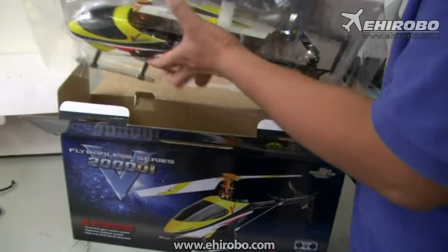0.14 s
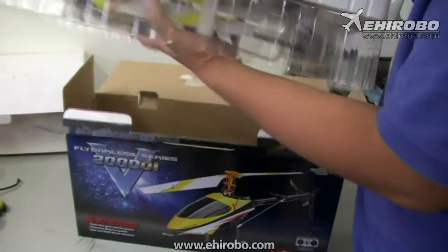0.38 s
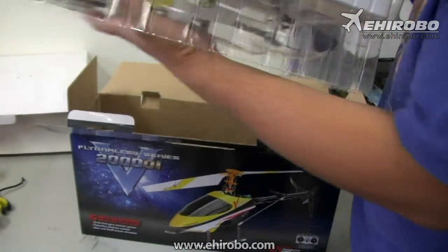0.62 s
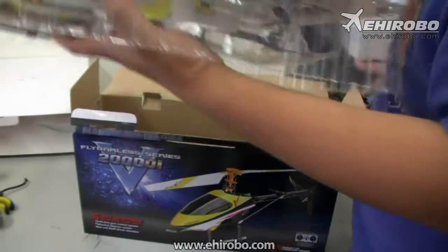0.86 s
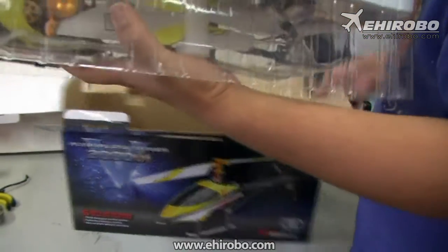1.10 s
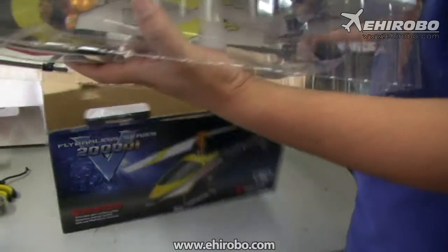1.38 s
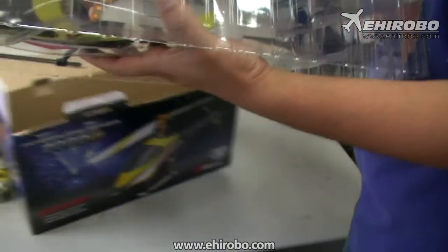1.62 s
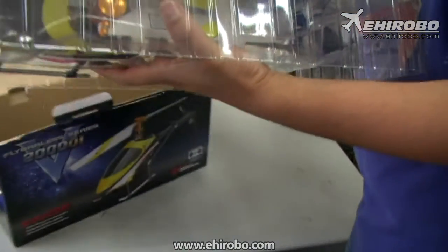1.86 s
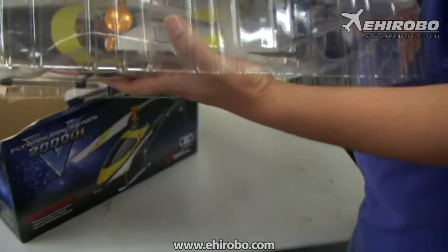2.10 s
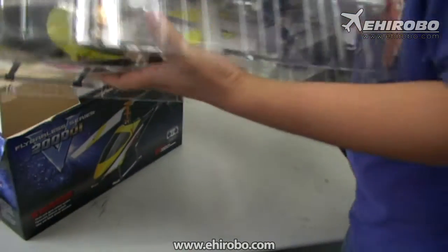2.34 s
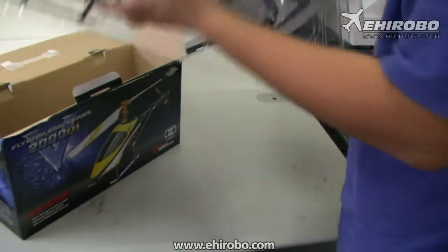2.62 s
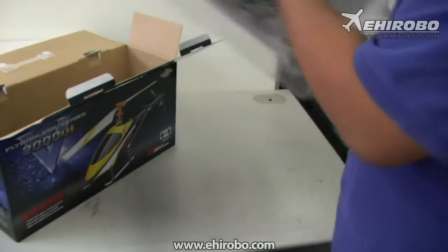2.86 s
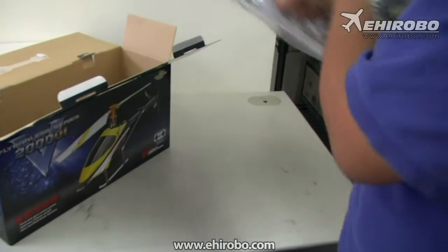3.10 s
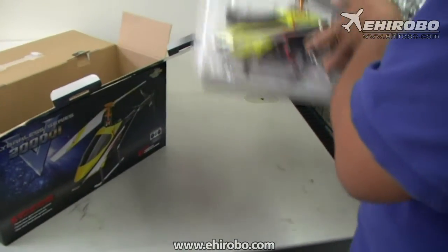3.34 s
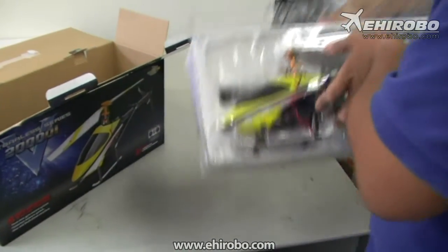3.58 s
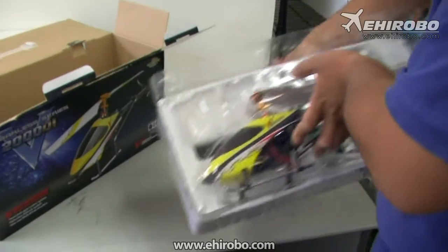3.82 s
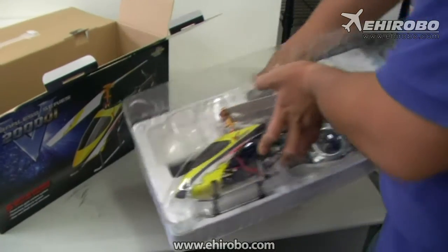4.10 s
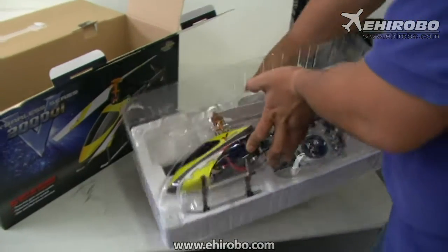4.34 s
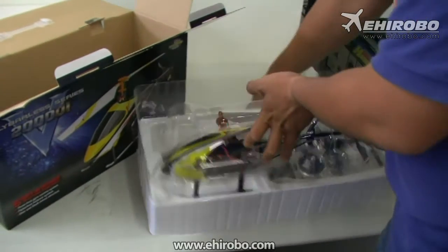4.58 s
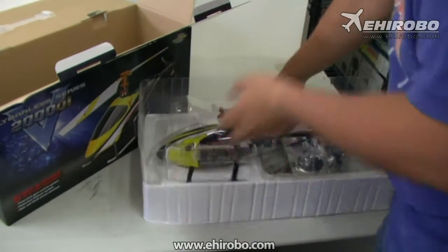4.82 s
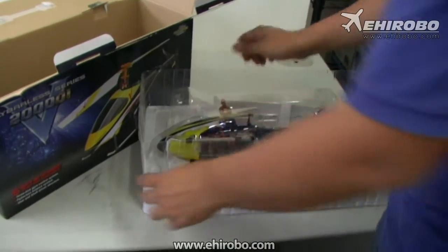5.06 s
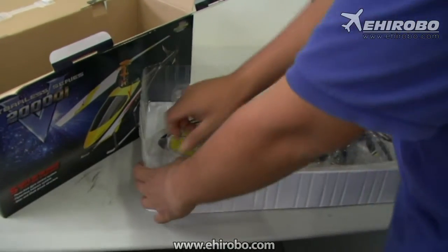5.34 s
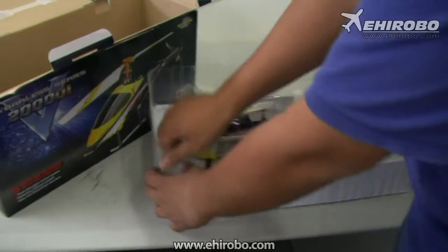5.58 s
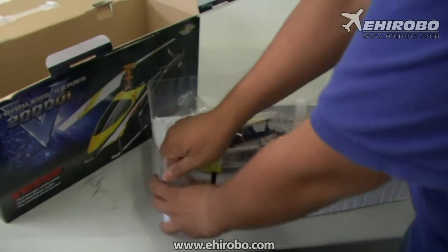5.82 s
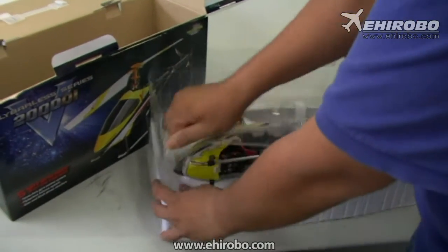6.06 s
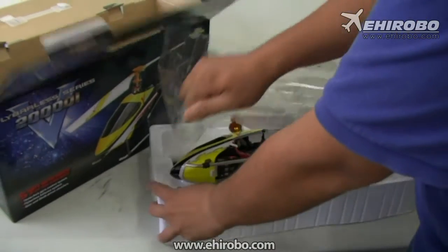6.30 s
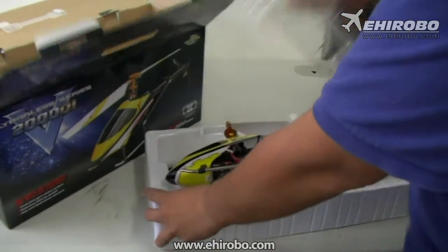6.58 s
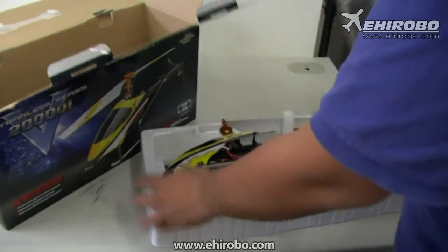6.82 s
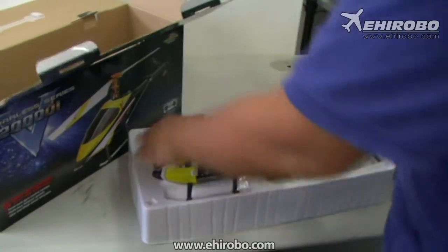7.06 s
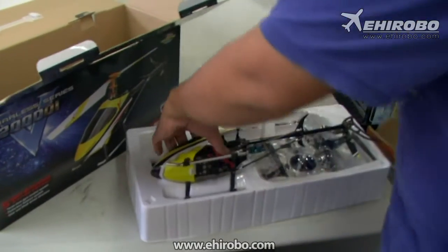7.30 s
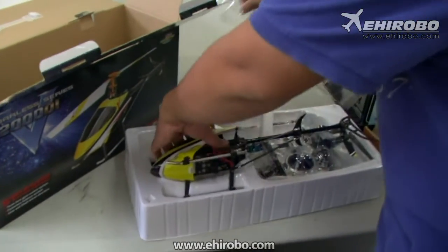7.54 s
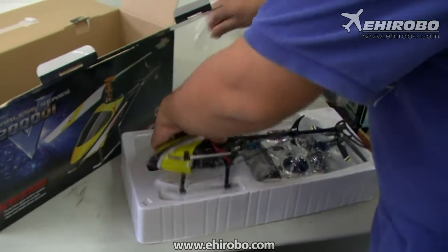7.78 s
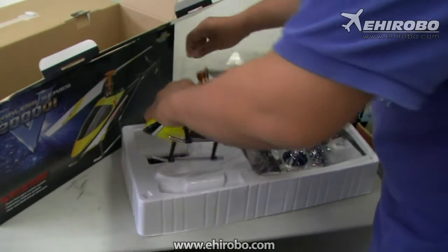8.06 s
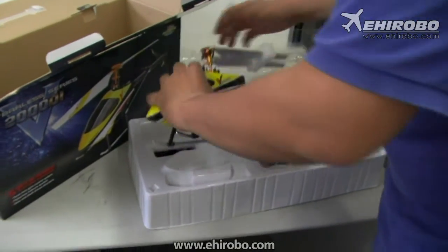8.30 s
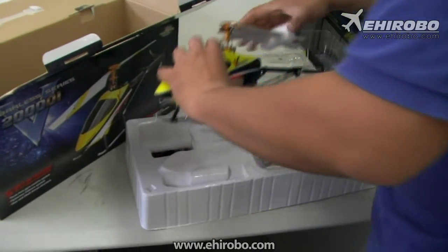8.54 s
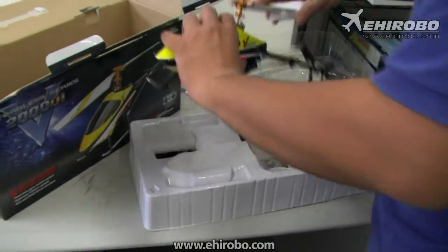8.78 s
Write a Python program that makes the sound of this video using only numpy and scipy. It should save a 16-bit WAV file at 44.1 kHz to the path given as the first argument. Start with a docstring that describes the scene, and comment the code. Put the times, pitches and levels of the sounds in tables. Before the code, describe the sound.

Hands lift a stiff plastic tray from a carton with soft crinkles and small snaps. The carton rubs across the table, then the tray is set down with clustered clacks. Prying off the lid brings very loud, sharp cracks that overload the microphone, followed by sparse clicks and knocks. Close stereo camera sound in a small hard room, with steady air and hiss.

```python
"""Hands lift a thin plastic tray out of a carton: stiff walls snap and crinkle as bursts of tiny slips ring them.
The carton is pushed aside, clumped slips rubbing card and plastic on the table, under faint narrow treble bands
of noise. The tray is set down and its lid pried off with the loudest snaps, which overload a camera microphone
pair; its gain control sinks and creeps back. A small hard room answers throughout, over steady air and hiss."""
import sys
import numpy as np
from scipy import signal
from scipy.io import wavfile
from scipy.ndimage import uniform_filter1d

SR = 44100
rng = np.random.default_rng(int(sys.argv[2]) if len(sys.argv) > 2 else 0)


def natural_amplitude(level_db):
    """Convert a level in decibels to a linear amplitude factor, elementwise."""
    exponent = np.asarray(level_db, float) / 20
    return 10 ** exponent


def output_pcm(signal):
    """Save a mono or channel-first signal as 16-bit PCM at the path in sys.argv[1].

    Samples are clipped to [-1, 1] before scaling.
    """
    pcm = np.clip(np.atleast_2d(signal).T, -1, 1) * 32767
    wavfile.write(sys.argv[1], SR, np.round(pcm).astype(np.int16))


N = 392931  # length in samples

# Snaps of buckling walls: start_s, level_db (relative), panel pitch_hz, crack_db (relative to level_db),
# buckling_s
SNAPS = [(0.042, -23.5, 514, -9.5, 0.0041), (0.103, -19.5, 575, -14.5, 0.0074),
         (0.202, -14.5, 633, -13.5, 0.013), (0.281, -15.5, 613, -24, 0.0055), (0.4, -19, 1700, -23, 0.0084),
         (0.429, -12.5, 1250, -39, 0.0061), (1.617, -28.5, 1370, -9.5, 0.035),
         (1.677, -5.5, 1600, -33, 0.0055), (2.263, -19, 345, -33, 0.014), (2.986, -18.5, 720, -16, 0.011),
         (3.062, -20.5, 584, -9, 0.013), (3.14, -27.5, 670, -8.5, 0.0079),
         (3.205, -16.5, 1120, -14.5, 0.011), (3.557, -22.5, 614, -42, 0.0062),
         (3.638, -16, 677, -59, 0.0071), (4.084, -14, 1130, -13.5, 0.0093),
         (4.112, -17, 690, -15.5, 0.0078), (4.154, -17.5, 710, -14.5, 0.016),
         (4.299, -4.5, 660, -17.5, 0.015), (4.385, -14, 860, -32, 0.0079), (4.543, -12, 522, -14, 0.015),
         (4.595, -5.5, 810, -20, 0.0079), (4.677, -9.5, 640, -22, 0.005),
         (4.697, -4.5, 1930, -24.5, 0.0059), (4.723, -16.5, 870, -12, 0.0051),
         (4.8, -10, 810, -15.5, 0.0094), (4.818, -13.5, 820, -37, 0.0093), (4.879, -16.5, 1320, -12, 0.036),
         (5.268, -13.5, 533, -21, 0.0039), (5.614, -22, 795, -30, 0.0088), (5.666, -16.5, 840, -38, .012),
         (5.804, -9, 830, -13, 0.0035), (5.829, -16.5, 840, -15.5, .008), (5.901, 15, 1600, -19.5, 0.0042),
         (6.013, -3, 784, -8.5, 0.012), (6.054, 13, 796, -12.5, 0.0047), (6.112, 7, 1990, -10.5, 0.0085),
         (6.262, -3, 795, -8, 0.0066), (6.355, 9, 920, -12, 0.0045), (6.42, 13.5, 923, -14.5, 0.0063),
         (6.429, -0.5, 746, -10.5, 0.0072), (6.457, 1, 690, -4, 0.0057),
         (6.737, -11.5, 1220, -20.5, 0.0048), (7.055, -38, 2650, 0.5, 0.0059),
         (7.137, -38.5, 1460, -4, 0.012), (7.272, -15, 1040, -44, 0.014), (7.292, -4.5, 1240, -44, 0.0084),
         (7.549, 9.5, 1304, -27.5, 0.0048), (7.587, -2.5, 720, -20, 0.0053),
         (7.665, -5, 714, -34.5, 0.0066), (7.828, -11.5, 2410, -25.5, 0.0055),
         (8.012, -17.5, 814, -50, 0.003), (8.091, -24, 1250, -23, 0.014), (8.155, 0.5, 706, -27.5, 0.014),
         (8.185, 5.5, 3050, -23.5, 0.01), (8.196, -3.5, 1600, -19.5, 0.013), (8.31, -3.5, 3020, -33, 0.024),
         (8.358, -9.5, 580, -41, 0.0061), (8.395, -4, 2900, -42, 0.0079)]
# Hollow pockets and walls of the tray: pitch_hz, width_hz, level_db (relative)
TRAY_MODES = [(518, 110, 3), (688, 64, 8), (810, 76, 5), (1250, 647, 0.5), (1600, 516, 2.5),
              (2030, 870, -2)]
# Spectrum of the sharp crack: frequency_hz, density_db (relative, per Hz)
CRACK_SPECTRUM = [(600, -16), (1200, 10.5), (2500, 11.5), (3900, 5), (5500, 2), (7500, -1), (12000, -4.5),
                  (15600, -15)]
# Spectrum of the sliding faces: frequency_hz, density_db (relative, per Hz)
SLIDE_SPECTRUM = [(1470, -27.5), (2500, -2), (3730, 0), (7370, -3), (9070, 0.5), (12400, -3.5),
                  (15600, -11.5)]
# Spectrum of the table's thud: frequency_hz, density_db (relative, per Hz)
THUD_SPECTRUM = [(90, -24.5), (190, -5), (330, -1.5), (480, 2.5), (900, -31.5)]
# Strokes of rubbing: start_s, length_s, creak_db (of tray or carton), hiss_db (sliding faces, relative to creak),
# drum_db (table, relative to creak), rubbed part's pitch_hz
STROKES = [(-.08, 0.21, -44.5, -2, -22, 1220), (0.275, 0.15, -46.5, -1.5, -18, 1220),
           (0.384, 0.14, -48, 1, -5, 1210), (1.024, 0.073, -51, -6, 1.5, 820),
           (1.081, 0.18, -37.5, -4.5, -12, 886), (1.217, 0.23, -49.5, 6, -24, 950),
           (1.6, 0.23, -35, -22.5, -1, 1360), (1.669, 0.38, -29.5, -1.5, -20.5, 1640),
           (2.024, 0.42, -50, 2.5, -4.5, 1380), (2.719, 0.26, -40.5, -11, -8.5, 1310),
           (2.958, 0.082, -28, -13, -45, 1400), (3.062, .28, -46, -3, -12, 1290),
           (3.765, 0.31, -46, -13.5, -14.5, 1045), (4.074, 0.16, -43, 5, -24, 720),
           (4.283, 0.15, -29.5, -8, -16.5, 950), (4.412, 0.15, -32, -46, -13.5, 864),
           (4.515, 0.19, -24, -16.5, -32.5, 1015), (4.657, 0.11, -24.5, -9.5, -13.5, 910),
           (4.759, .25, -33.5, -9, -4, 890), (5.24, 0.24, -35, -28, -8, 870),
           (5.494, 0.35, -31.5, -48.5, -16, 847), (5.727, 0.18, -30, -19, -16, 880),
           (5.937, 0.12, -16.5, -1.5, -20, 1600), (6.09, 0.17, -19, -9.5, -12.5, 1600),
           (6.239, 0.1, -54, 26, -23, 1600), (6.378, 0.34, -37, -42, -24.5, 5230),
           (7.262, 0.13, -32.5, -13, -5.5, 1300), (7.665, 0.093, -32, -44, -14, 810),
           (8.184, 0.36, -28, -39.5, -5.5, 2750), (8.757, 0.39, -48, 10, -21, 5600)]
# Light treble crinkles of thin plastic: start_s, peak_db (dry)
CRINKLES = [(0.0437, -18.5), (0.4287, -19.5), (1.782, -15.5), (1.841, -17), (1.913, -26), (3.1448, -17.5),
            (3.2637, -29), (4.369, -26), (4.7506, -22), (5.3103, -32.5), (5.481, -37), (5.8152, -16),
            (5.97, -7.5), (6.0013, -13), (6.033, -3), (6.153, -2), (6.1818, -2), (6.21, -4), (6.362, 4.5),
            (6.922, -35), (7.061, -19.5), (7.146, -23.5), (7.717, -33.5), (8.6644, -33.5), (8.7197, -32)]
# Faint narrow treble bands of noise during the slide: start_s, length_s, level_db, bands_hz
TREBLE_BANDS = 1.667, 0.35, -33.5, (8850, 9700, 10600, 11700, 12900)
# Near echoes off table and carton: delay_s, level_db
ECHOES = [(.0021, -14), (.0085, -7)]
# Decay of the room: frequency_hz, t60_s
ROOM_DECAY = [(80, 0.097), (150, 0.57), (500, 0.34), (1500, 0.37), (4000, 0.34), (10000, 0.26)]
# Left-right likeness of the room tail: frequency_hz, likeness (0 to 1)
TAIL_LIKENESS = [(200, 0.98), (1000, 0.83), (3000, 0.76), (10000, 0.099)]
# Spectrum of room air and microphone hiss: frequency_hz, density_db (relative, per Hz)
AIR_SPECTRUM = [(32, -27), (62, -6.5), (133, -9.5), (270, -8), (563, -4.5), (642, -2), (856, -4.5),
                (2030, -9), (8130, -23), (11700, -22.5), (14100, -27.5), (15600, -52)]
# Left-right likeness of the room air: frequency_hz, likeness (0 to 1)
AIR_LIKENESS = [(60, 0.93), (240, 0.77), (950, 0.65), (3770, 0.65), (15000, 0.14)]


def evened(x):
    """Scales to rms 1."""
    return x / np.sqrt(np.mean(x ** 2) + 1e-20)


def read(points, hz):
    """Reads a table on a log-frequency axis."""
    f, value = np.transpose(points)
    return np.interp(np.log(hz + 1), np.log(f + 1), value)


def colour(points):
    """Causal (minimum-phase) filter of energy 1 with the given spectrum."""
    hz = abs(np.fft.fftfreq(2048, 1 / SR))
    log_gain = np.log(natural_amplitude(np.maximum(read(points, hz), -90)))
    taps = np.fft.ifft(np.exp(np.conj(signal.hilbert(log_gain)))).real[:1024]
    return taps / np.linalg.norm(taps)


def ring(x, hz, width_hz):
    """One damped mode driven by x; a wider mode dies sooner."""
    r = np.exp(-np.pi * width_hz / SR)
    return signal.lfilter([1 - r, 0, r - 1], [1, -2 * r * np.cos(2 * np.pi * hz / SR), r * r], x)


def tray(x, touched_hz, spread_db):
    """All modes of the tray; those far from the touched part's pitch are reached less, plus spread_db."""
    distance_oct = np.array([abs(np.log2(hz / touched_hz)) for hz, _, _ in TRAY_MODES])
    reach_db = np.array([db for _, _, db in TRAY_MODES]) - 5 * distance_oct + spread_db
    return sum((-1) ** k * natural_amplitude(reach_db[k]) * ring(x, hz, width_hz)
               for k, (hz, width_hz, _) in enumerate(TRAY_MODES))


def slips(per_s, uneven_db, size):
    """Random tiny stick-slip clicks of uneven size."""
    hit = rng.random(size) < per_s / SR
    unevenness = natural_amplitude(uneven_db * np.minimum(rng.exponential(1, size), 4))
    return hit * rng.standard_normal(size) * unevenness


def snaps():
    """A wall flips over in a few milliseconds of slips, ringing its own panel, the tray and the table.
    Returns the sound towards the microphone and the sound sent all around, where the slips average out."""
    near, around = np.zeros((2, N + 4096)), np.zeros(N + 4096)
    t = np.arange(2048) / SR
    crack, thud = colour(CRACK_SPECTRUM), colour(THUD_SPECTRUM)
    for start_s, level_db, hz, crack_db, buckling_s in SNAPS:
        # the walls go on crinkling a little after the flip
        settling = np.exp(-(t / buckling_s) ** 3) + 0.086 * np.exp(-t / 0.045)
        onset = 1 - np.exp(-t / 0.00027)
        push, *per_port = slips(20000, 2, size=(3, 2048)) * onset * settling
        # the first give moves the panel most
        kick = push * np.exp(-t / (0.5 * buckling_s)) + 3 * (np.arange(2048) == 8)
        soft = t * np.exp(-2 * np.pi * 8 * hz * t)  # a large, low panel gives way slowly
        panel = ring(soft, hz, hz * (0.099 + hz / 20000))
        walls = tray(soft, hz, 2 * rng.standard_normal(len(TRAY_MODES)))
        # panels pitched below the tray's first mode reach its walls less
        walls_db = -4 + 12 * min(np.log2(hz / TRAY_MODES[0][0]), 0)
        # louder and higher snaps thump the table relatively less
        thud_db = -28 - 0.27 * level_db - 8 * np.log2(hz / 700)
        gritty = push + 0.41 * np.array(per_port)
        parts = [(-4, kick, panel), (walls_db, push, walls), (thud_db, kick, thud),
                 (crack_db + 13.0, gritty, crack)]
        lean_db = 0.3 * rng.standard_normal()  # left-right lean
        lean = natural_amplitude(np.array([[lean_db], [-lean_db]]))
        at = round(start_s * SR)
        for part_db, drive, body in parts:
            size = natural_amplitude(level_db + part_db - 11.0) * np.linalg.norm(settling)
            body = body[:1024]
            sound = signal.fftconvolve(drive * np.ones((2, 1)), body[None], axes=1)
            near[:, at:at + 3071] += lean * size * sound / np.linalg.norm(sound[0])
            around[at:at + 1024] += size * body / np.linalg.norm(body)
    return near[:, :N], around[:N]


def rubbing():
    """Dense slips under the hands, coming in clumps, excite tray, faces and table."""
    # the hand's speed is one arch per stroke; lean under 1 = early peak
    lean, creak_power, hiss_power, drum_power = 0.79, 1.67, 1.38, 1.85
    wander = uniform_filter1d(uniform_filter1d(rng.standard_normal(N), 220), 150)
    clumps = natural_amplitude(2.7 * evened(wander))
    drive = slips(4000, 1.12, size=N) * clumps
    # other faces slip apart for each port
    fine = drive + 0.84 * slips(6000, 1.2, size=(2, N)) * clumps ** 0.13
    hiss = evened(signal.oaconvolve(fine, colour(SLIDE_SPECTRUM)[None], axes=1)[:, :N])
    drum = evened(signal.oaconvolve(drive, colour(THUD_SPECTRUM))[:N])
    out = np.zeros((2, N))
    for start_s, length_s, creak_db, hiss_db, drum_db, hz in STROKES:
        span = slice(max(round(start_s * SR), 0), min(round((start_s + length_s) * SR), N))
        progress = np.clip((np.arange(N)[span] / SR - start_s) / length_s, 0, 1)
        speed = abs(np.sin(np.pi * progress ** lean))
        # tiny knocks land on six small panels near the rubbed part
        panels_hz = hz * 2 ** rng.uniform(-0.4, 0.8, 6)
        knocks = sum(ring(slips(30, 3.6, size=len(speed)), f, 0.096 * f) / np.sqrt(f) for f in panels_hz)
        # small high parts ring more alone
        own = (hz / 2800) ** 2 * evened(ring(drive[span], hz, 0.4 * hz))
        creak = evened(0.75 * evened(knocks) + evened(tray(drive[span], hz, 0)) + own)
        stroke = speed ** creak_power * creak
        stroke = stroke + natural_amplitude(hiss_db) * speed ** hiss_power * hiss[:, span]
        stroke += natural_amplitude(drum_db) * speed ** drum_power * drum[span]
        out[:, span] += natural_amplitude(creak_db) * stroke
    return out


def crinkles():
    """Each crinkle is a short dying burst of slips with the colour of the sliding faces and a ring of its own."""
    out, t = np.zeros((2, N + 2048)), np.arange(1024) / SR
    face = colour(SLIDE_SPECTRUM)[None]
    for start_s, peak_db in CRINKLES:
        shared, *per_port = slips(15000, 1.3, size=(3, 1024)) * np.exp(-t / 0.0067)
        burst = signal.fftconvolve(shared + 1.1 * np.array(per_port), face, axes=1)
        own_hz = rng.uniform(3000, 10000)  # each fold rings at its own pitch
        burst = evened(burst) + 0.82 * evened(ring(burst, own_hz, 0.12 * own_hz))
        at = round(start_s * SR)
        out[:, at:at + 2047] += natural_amplitude(peak_db) * burst / abs(burst).max()
    return out[:, :N]


def treble_bands():
    """Faint narrow treble bands of noise swell and fade once during the slide; each is noise through a resonance."""
    start_s, length_s, level_db, bands_hz = TREBLE_BANDS
    swell = np.sin(np.pi * np.clip((np.arange(N) / SR - start_s) / length_s, 0, 1))
    shared, *per_port = rng.standard_normal((3, N))
    noise = shared + np.array(per_port)
    return natural_amplitude(level_db) * swell * evened(sum(ring(noise, hz, 70) for hz in bands_hz))


def paired_noise(size, likeness, magnitude, frames):
    """Two channels of random short-time spectra that share a part."""
    a, b, c, d = rng.standard_normal((frames, size // 2 + 1, 4)).T
    likeness = np.clip(likeness, -1, 1)[:, None]
    left = a + 1j * b
    right = likeness * left + np.sqrt(1 - likeness ** 2) * (c + 1j * d)
    return signal.istft(np.array([left, right]) * magnitude, nperseg=size, noverlap=size * 3 // 4)[1]


def room(near, around):
    """Near echoes, then three tails taking turns, each band dying at its own speed."""
    early = np.zeros((2, 1500))
    early[:, 0] = 1  # direct sound
    for delay_s, level_db in ECHOES:
        at = round(delay_s * SR) + rng.integers(-2, 3, 2)
        early[[0, 1], at] = natural_amplitude(level_db) * rng.choice([-1, 1])
    out = signal.oaconvolve(near, early, axes=1)[:, :N]
    hz, t = np.fft.rfftfreq(256, 1 / SR), np.arange(400) * 64 / SR
    dying = natural_amplitude(-60 * t / read(ROOM_DECAY, hz)[:, None]) * np.clip(t / 0.0033, 0, 1)
    for k in range(3):
        tail = paired_noise(256, read(TAIL_LIKENESS, hz), dying, 400)
        tail = tail / np.linalg.norm(tail[0])
        # the three squared weights always add up to 1
        turn = np.sqrt(2 / 3) * np.cos(np.pi * (np.arange(N) / SR * 7 + k / 3))
        out += natural_amplitude(-2.5) * signal.oaconvolve((around * turn)[None], tail, axes=1)[:, :N]
    return out


def air():
    """Steady room air and microphone hiss, shaped noise wavering a little in time and pitch range."""
    frames, hz = N // 256 + 5, np.fft.rfftfreq(1024, 1 / SR)
    patches = rng.standard_normal((frames, 513)).T
    patches = evened(uniform_filter1d(uniform_filter1d(patches, 10, 0), 14, 1))
    magnitude = natural_amplitude(read(AIR_SPECTRUM, hz)[:, None] + 2.0 * patches)
    noise = paired_noise(1024, read(AIR_LIKENESS, hz), magnitude, frames)[:, :N]
    return natural_amplitude(-48) * evened(noise)


def scene():
    """Handling and treble bands in the room, over the room air."""
    near, around = snaps()
    sliding = rubbing() + crinkles() + treble_bands()
    return room(near + sliding, around + sliding.mean(0)) + air()


def roll_off(x):
    """The treble ends steeply here."""
    return signal.sosfilt(signal.butter(12, 15790, fs=SR, output="sos"), x)


def record(dry):
    """The microphone cuts the deep bass; gain control ducks by a held level; the loudest peaks clip."""
    cut = signal.sosfilt(signal.butter(2, 110, "high", fs=SR, output="sos"), dry)
    power = uniform_filter1d((cut ** 2).mean(0), 2000, origin=999)  # looks back only
    power_db = 10 * np.log10(abs(power) + 1e-12)
    fall_db = np.arange(N) * 10.24 / SR  # the held level sinks by 10.24 dB a second
    held_db = np.maximum.accumulate(power_db + fall_db) - fall_db
    over_db = np.maximum(held_db + 15.0, 0)  # threshold -15 dB
    duck_db = 0.84 * uniform_filter1d(over_db, 1500, origin=749)
    ducked = cut / natural_amplitude(duck_db)
    overloaded = np.clip(ducked, -1, 1)
    return roll_off(overloaded)


dry = scene()
out = record(dry)
output_pcm(out)
```